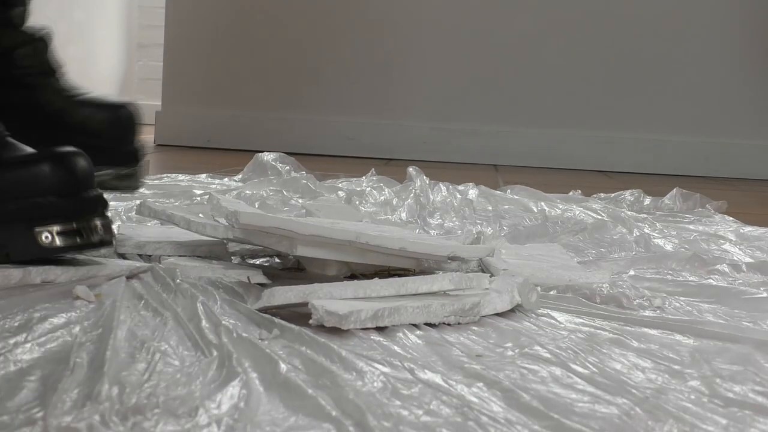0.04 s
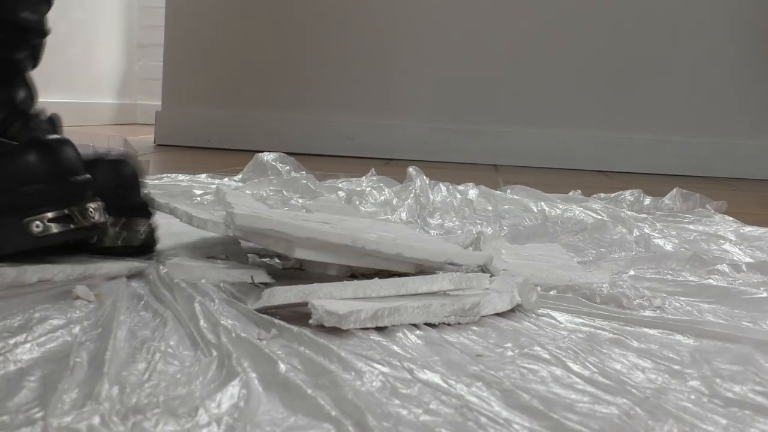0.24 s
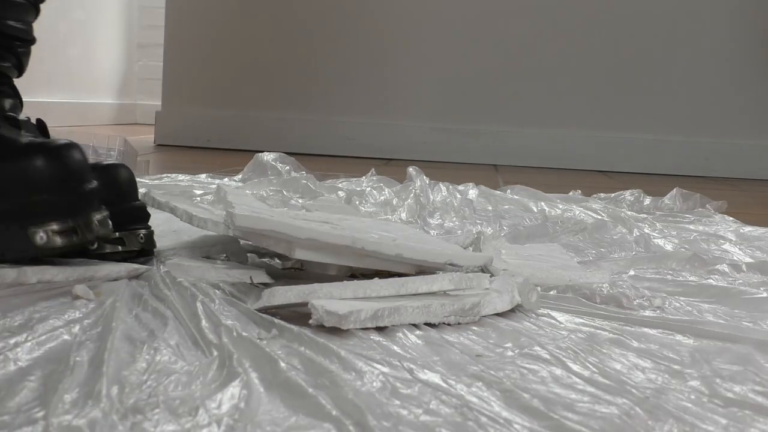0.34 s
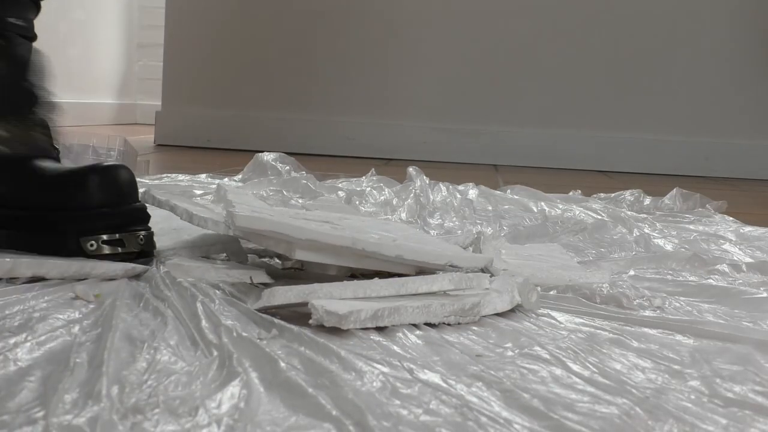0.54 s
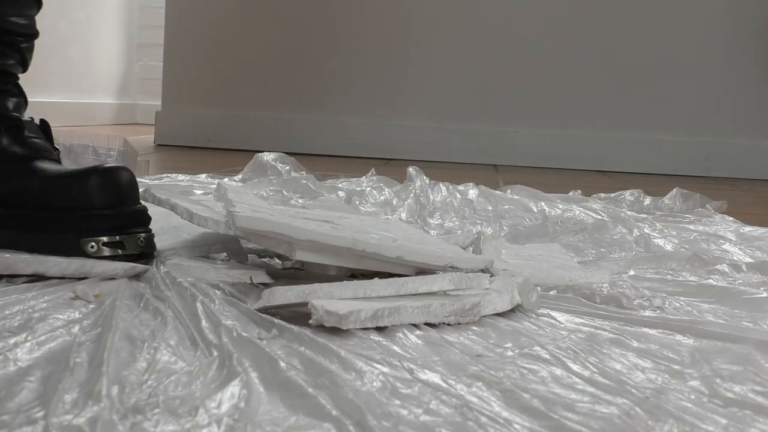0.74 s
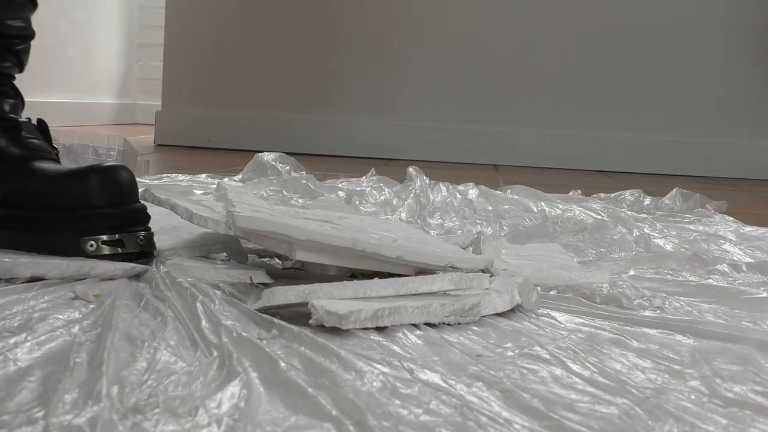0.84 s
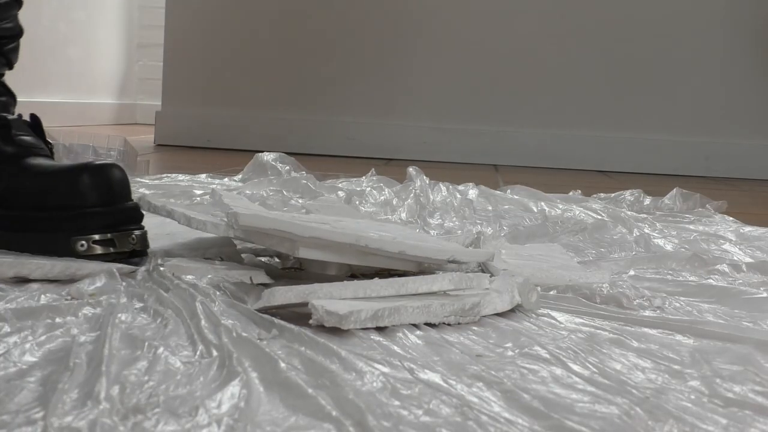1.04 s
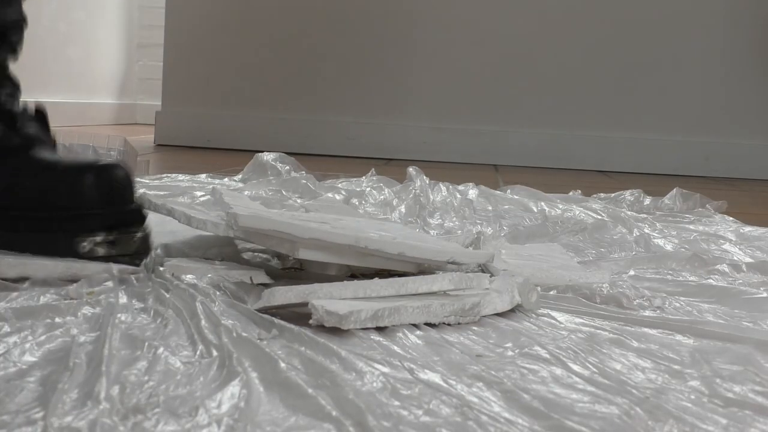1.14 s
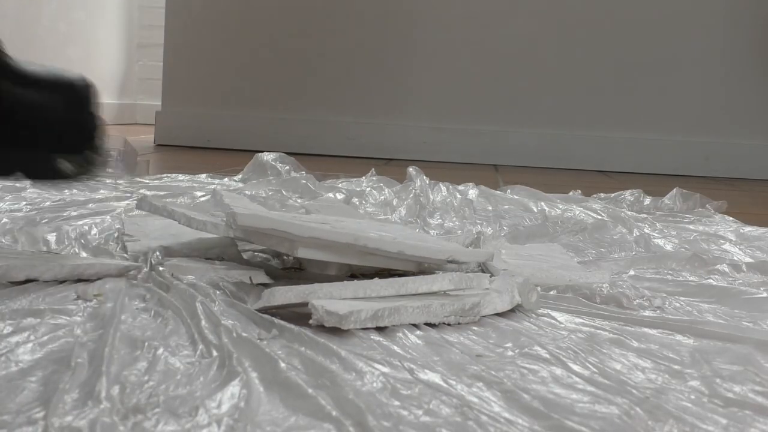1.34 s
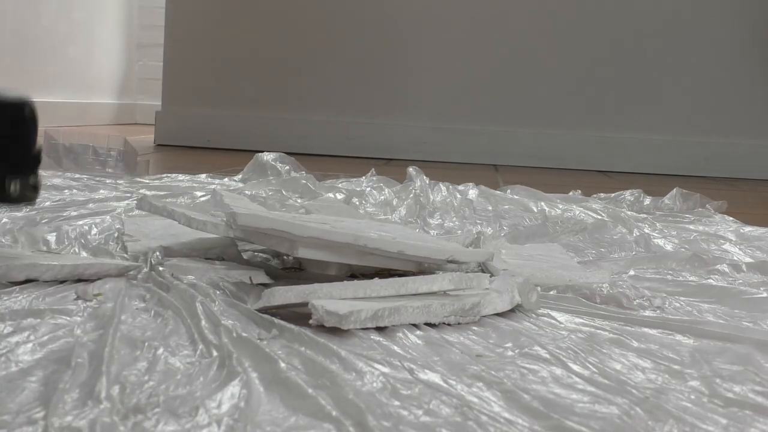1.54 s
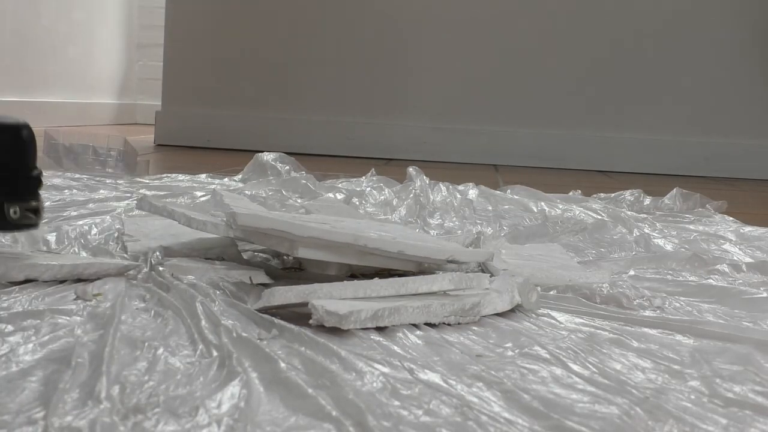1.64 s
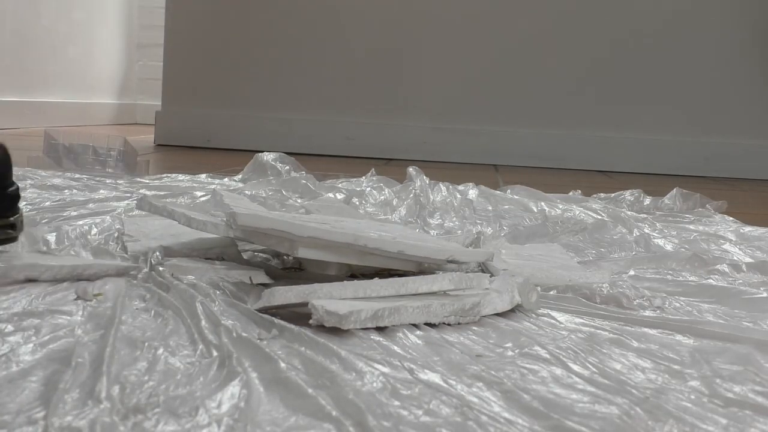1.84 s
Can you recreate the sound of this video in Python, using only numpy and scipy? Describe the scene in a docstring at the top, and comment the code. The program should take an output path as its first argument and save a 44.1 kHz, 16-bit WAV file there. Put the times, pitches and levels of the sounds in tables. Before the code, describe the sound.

Foam slabs crunching and snapping as a boot stomps twice, then drags away indoors.

```python
"""Two boot steps on styrofoam

Slabs lie on plastic sheeting in a small room, close to the microphones and a little to the left.
A heavy stomp crushes one, which rings out over a boom of the floor; the sheet ticks and rustles.
The second step knocks and squeezes the foam until it snaps, and the boot drags away."""
import sys
import numpy as np
from scipy import signal
from scipy.fft import rfft, irfft, next_fast_len
from scipy.io import wavfile
from scipy.ndimage import uniform_filter1d

SR = 44100
rng = np.random.default_rng(int(sys.argv[2]) if len(sys.argv) > 2 else 0)


def master(y):
    """Save y as 16-bit WAV."""
    cut = np.clip(np.atleast_2d(y).T, -1, 1)
    pcm = np.round(cut * 32767)  # scale
    wavfile.write(sys.argv[1], SR, pcm.astype(np.int16))


N = 83790
T = np.arange(N) / SR
STOMP_S = .2485
# the slab's modes: pitch_hz, level_db, t60_s
SLAB_MODES = [(355, -10, .6), (524, -1, .7), (1020, -4, 1), (1067, 1, 1.2), (1138, 0, 1), (1289, 1, 1.1),
              (1563, 1, 1.2), (1766, -2, 1.2), (1823, -3, 1.1), (2047, -3, 1.1), (2205, -4, .9),
              (2377, -3, 1), (2557, -1, 1), (3303, -8, .7)]


def amp(db):
    return 10 ** (np.asarray(db) / 20)


def unit_rms(x):
    return x / np.sqrt(np.mean(x ** 2) + 1e-20)


def curve_at(points, hz):
    """Join (freq_hz, value) points on a log frequency axis."""
    freqs, values = np.transpose(points)
    return np.interp(np.log(hz + 1), np.log(freqs + 1), values)


def colour(x, gain_db):
    """Minimum-phase filter; gain_db is a function of frequency."""
    size = 2 * next_fast_len(N // 2 + 8192, True)
    gain = amp(gain_db(np.fft.rfftfreq(size, 1 / SR)))
    cepstrum = irfft(np.log(np.maximum(gain, 1e-6)))
    cepstrum[1:size // 2] *= 2
    cepstrum[size // 2 + 1:] = 0
    return irfft(rfft(x, size) * np.exp(rfft(cepstrum)), size)[..., :N]


def hiss(tone):
    """Even coloured noise, rms 1."""
    return unit_rms(colour(rng.standard_normal(N), lambda hz: curve_at(tone, hz)))


def crackle(tone, per_s, spread_db, tilt_db=0):
    """Tiny random breaks of uneven size over an even rub, coloured and tilted per octave, rms 1."""
    chance, size, rub = rng.random(N), rng.standard_normal(N), rng.standard_normal(N)
    breaks = (chance < per_s / SR) * np.sign(rub) * amp(spread_db * np.clip(size, -2, 2))
    gain_db = lambda hz: curve_at(tone, hz) + tilt_db * np.log2(np.maximum(hz, 500) / 1000)
    return unit_rms(colour(unit_rms(breaks) + .5 * rub, gain_db))


def fader(points):
    """Gain through (time_s, level_db) points, fading out within 5 ms outside them."""
    times, db = np.transpose(points)
    gate = np.clip(np.minimum(T - times[0], times[-1] - T) / .005 + 1, 0, 1)
    return amp(np.interp(T, times, db)) * gate


def swell(peak_s, level_db, rise_db_per_s, fall_db_per_s, end_s):
    """Gain that climbs to a peak, falls away and stops."""
    below_db = np.maximum((peak_s - T) * rise_db_per_s, (T - peak_s) * fall_db_per_s)
    return amp(level_db - below_db) * np.clip((end_s - T) / .013, 0, 1)


def hump(start_s, rise_s):
    """Quick rise to 1 and a quick fall."""
    age = np.maximum(T - start_s, 0) / rise_s
    return (age * np.exp(1 - age)) ** 2


def ping(start_s, level_db, pitch_hz, rise_s):
    """A few heavily damped cycles."""
    return amp(level_db) * hump(start_s, rise_s) * np.sin(2 * np.pi * pitch_hz * (T - start_s))


def through_slab(x, lift_db=3.5, half_width_hz=26):
    """What passes through the slab is lifted at its modes and dips between them."""
    peaks = lambda hz: sum(1 / (1 + ((hz - mode) / half_width_hz) ** 2) for mode, _, _ in SLAB_MODES)
    return colour(x, lambda hz: lift_db * (np.minimum(peaks(hz), 1) - .5))


def hollow(x, centre_hz=789, octaves=.15, dip_db=-15.5):
    """The slab hardly radiates in the gap between its deep flex and its higher modes."""
    return colour(x, lambda hz: dip_db * np.exp(-(np.log2((hz + 1) / centre_hz) / octaves) ** 2))


def faint_hiss():
    """A thin treble hiss lies under both steps and slowly sinks."""
    # its course: time_s, level_db
    levels = [(0, -43.5), (.24, -41.5), (.7, -46.5), (.86, -52.5), (1.9, -54.5)]
    # its spectrum: freq_hz, gain_db
    tone = [(1000, -2.5), (3500, -0.5), (10000, -3), (15500, -5)]
    return fader(levels) * hiss(tone)


def floor_under_boot():
    """The boot's weight shuffles about and sets the floor booming."""
    # shifts of weight: peak_s, level_db, rise_db_per_s, fall_db_per_s, end_s
    shifts = [(0.059, -36.5, 300, 39, 0.42), (0.308, -30.5, 400, 57.5, 1.2), (0.689, -47.5, 148, 100, 0.77),
              (0.898, -40, 903, 81, .99), (1.79, -56, 400, 93, 1.94)]
    # their spectrum: freq_hz, gain_db
    shift_tone = [(30, -9), (90, -14.5), (180, -2.5), (310, 1.5), (470, 0), (700, -12), (1200, -43.5),
                  (4000, -79)]
    # the floor's boom: time_s, level_db
    boom_levels = [(0.0, -52), (0.12, -61), (0.226, -45), (0.248, -52), (0.316, -35.5), (0.586, -46.5),
                   (0.628, -59), (0.756, -53), (0.776, -60), (0.878, -59), (0.894, -66), (1.046, -68),
                   (1.078, -49), (1.27, -46), (1.422, -59.5), (1.9, -67)]
    # its spectrum: freq_hz, gain_db
    boom_tone = [(20, -30), (40, -26), (56, 0.5), (72, -23), (98, -9), (140, -36), (500, -78)]
    shuffle = sum(swell(*row) for row in shifts) * crackle(shift_tone, per_s=1500, spread_db=4)
    return shuffle + fader(boom_levels) * crackle(boom_tone, per_s=2300, spread_db=.5)


def slab_groans():
    """Breaking cells merge into a groan as the slab takes the load."""
    # groans: peak_s, level_db, rise_db_per_s, fall_db_per_s, end_s
    groans = [(.1, -36, 32, 8, .25), (0.264, -21, 1498, 42, .85), (.885, -30, 1500, 15, 1)]
    # their spectrum: freq_hz, gain_db
    tone = [(100, -39), (300, -16.5), (520, -11.5), (650, -14.5), (790, -16.5), (1050, -5), (1500, 0),
            (2000, -6.5), (2600, -6), (3500, -14), (5000, -27.5), (15000, -33)]
    cells = unit_rms(through_slab(crackle(tone, per_s=2300, spread_db=1)))
    return sum(swell(*row) for row in groans) * cells


def sole_thuds():
    """The sole knocks dully on the floor."""
    # knocks: start_s, level_db, pitch_hz, rise_s
    thuds = [(0.050, -29.5, 441, 0.0045), (.062, -32, 450, .008), (0.194, -37, 189, 0.015),
             (.262, -25.5, 351, .007), (.288, -23, 289, 0.0057), (.296, -28.5, 137, 0.013),
             (.363, -27.5, 188.6, 0.008), (.475, -35, 159, 0.013), (0.8635, -17.5, 228, 0.0032),
             (0.8663, -23, 335, 0.0058), (0.885, -36.5, 205.4, 0.019), (.915, -34.5, 294, .016),
             (1.05, -31, 280, 0.0027)]
    return sum(ping(*row) for row in thuds)


def foam_snaps():
    """Each snap rings the foam for a few cycles and throws a splinter of noise."""
    # snaps: start_s, level_db, pitch_hz, rise_s, splinter_db
    snaps = [(0.0915, -22.5, 1430, 0.001, -34), (0.114, -27, 1460, 0.00089, -30),
             (0.1413, -17.5, 1480, 0.00093, -36), (.167, -26, 1500, .0008, -32),
             (0.156, -19.5, 1620, 0.00088, -35), (.2480, -3, 2380, 0.00018, -14),
             (0.2513, -2, 2200, 0.00033, -14), (0.2535, -6, 2690, 0.00017, -13),
             (0.2574, -12, 3000, 0.00026, -20), (0.2613, -10, 1700, 0.0014, -25),
             (0.266, -10, 3300, 0.0005, -26), (0.2785, -11, 1450, 0.0007, -30),
             (0.300, -10, 1380, 0.0013, -26), (.3660, -12.5, 5600, .0012, -25),
             (.3675, -11.5, 2880, .0005, -24), (0.8397, -27, 890, 0.00074, -20),
             (0.8626, -13, 1610, 0.00045, -26), (.8684, -5.5, 2440, 0.0003, -17),
             (0.8685, 2.5, 1487, 0.0012, -25), (.8690, -13.5, 955, .0011, -34),
             (.8632, -18, 596, 0.00079, -28), (0.9825, -0.5, 2510, 0.00036, -19.5),
             (0.9821, -9.5, 1400, 0.0008, -21), (1.0404, -11.5, 1880, 0.00034, -16)]
    # a splinter's spectrum: freq_hz, gain_db
    splinter_tone = [(500, 5), (3000, 6), (6000, -8.5), (11000, -1), (15500, -1), (18000, -27)]
    splinter = hiss(splinter_tone)
    cracks = sum(ping(start, db, hz, rise) + amp(splinter_db) * hump(start, rise) * splinter
                 for start, db, hz, rise, splinter_db in snaps)
    low_cut = signal.butter(2, 430, "high", fs=SR, output="sos")  # the snaps carry no bass
    return signal.sosfilt(low_cut, cracks)


def foam_settling():
    """The crushed foam crackles brightly as it settles."""
    # the crackle's course: time_s, level_db
    levels = [(.246, -32), (.252, -30), (.275, -28), (.315, -30.5), (.36, -29.5), (.385, -26.5),
              (.43, -28.5), (.5, -34.5), (.6, -45.5), (.7, -50.5), (.74, -50)]
    # its spectrum: freq_hz, gain_db
    tone = [(1500, -32), (2700, 2), (4000, -0.5), (6000, 0), (8500, -6), (11500, -6.5), (15800, -20)]
    return fader(levels) * crackle(tone, per_s=3700, spread_db=0)


def foam_crunches():
    """Cells break in clumps under both steps, and in a long squeeze under the second."""
    # clumps: start_s, level_db, length_s, tilt_db_per_octave
    clumps = [(0.248, -21.5, .016, -1), (0.283, -20, 0.0033, -3), (0.3661, -14, 0.0049, 1),
              (0.3813, -18, .0006, 7), (0.943, -24.5, 0.006, -8.5), (0.974, -20, 0.0022, 10),
              (0.9814, -17.5, 0.0019, 1), (0.9866, -17, 0.002, 0), (1.029, -22.5, 0.0037, -2),
              (1.0462, -23.5, 0.0056, -2)]
    # the squeeze: time_s, level_db
    squeeze = [(.855, -66), (.865, -28), (.90, -38.5), (.94, -25), (.975, -23), (.99, -33), (.999, -37),
               (1.025, -33), (1.06, -36.5), (1.1, -63)]
    # spectrum of breaking cells: freq_hz, gain_db
    tone = [(150, -29), (480, -21), (680, -31), (850, -23.5), (1100, 0.5), (1600, 1), (2900, -2.5),
            (3600, -4), (4400, -9.5), (7000, -11), (10000, -9.5), (15500, -21)]
    out = fader(squeeze) * crackle(tone, per_s=3600, spread_db=4)
    for start, db, length, tilt in clumps:
        attack = np.clip((T - start) / .0003, 0, 1)
        release = np.exp(-np.maximum(T - start - length, 0) / .001)
        out += amp(db) * attack * release * crackle(tone, per_s=5700, spread_db=4.5, tilt_db=tilt)
    return out


def slab_crush(start_hz=2610, end_hz=1180, sag_s=.019, hold_s=.025, fall_db_per_s=274):
    """A run of cracks under the stomp, ever lower and weaker as the slab gives way."""
    out = np.zeros(N)
    for k, (jitter, detune, size) in enumerate(rng.standard_normal((52, 3))):
        age = abs(k + .396 * jitter) * .0011
        hz = (end_hz + (start_hz - end_hz) * np.exp(-age / sag_s)) * np.exp(.27 * detune)
        db = -9.5 + 2 * size - fall_db_per_s * max(age - hold_s, 0)
        out += ping(STOMP_S + age, db, hz, rise_s=.00038)
    return out


def slab_ring(level_db=-29, rise_s=.0023):
    """After the stomp the slab's modes die away slowly, each slightly unsteady."""
    age = np.maximum(T - STOMP_S, 0)
    drifts = 4 * np.cumsum(rng.standard_normal((len(SLAB_MODES), N)), axis=1) / np.sqrt(SR)
    modes = sum(amp(db - 60 * age / t60) * np.sin(2 * np.pi * hz * age + drift)
                for (hz, db, t60), drift in zip(SLAB_MODES, drifts))
    return amp(level_db) * modes * (1 - np.exp(-age / rise_s))


def slab_flex(start_s=.256, start_hz=544.4, sag_hz_per_s=750):
    """The slab bends unevenly with a deep, falling note."""
    judder = 1 + .8 * unit_rms(uniform_filter1d(rng.standard_normal(N), size=180))
    mean_hz = start_hz - sag_hz_per_s * (T - start_s) / 2
    return judder * ping(start_s, -23.5, mean_hz, rise_s=.023)


def plastic_sheet(tick_rise_s=.00016, tick_noise_db=-11):
    """The film rustles, swishes as it is pulled taut, and ticks as its creases flip."""
    # rustles: peak_s, level_db, rise_db_per_s, fall_db_per_s, end_s
    rustles = [(.437, -30, 700, 500, .6), (.545, -41, 300, 200, .7), (.759, -27.5, 850, 400, .83),
               (.81, -38, 260, 90, .86), (1.568, -49, 600, 260, 1.7), (1.648, -44, 330, 110, 1.95)]
    # flipping creases: start_s, level_db, pitch_hz
    creases = [(.5496, -10, 9000), (.5546, -23, 9800), (.5885, -11, 10200), (.5982, -26, 10500),
               (.7069, -15.5, 9300), (.7303, -16, 9500), (.7328, -20, 9300), (.7386, -17, 9400),
               (.7448, -16, 9000), (.7503, -15, 9700), (.7559, -13, 9900)]
    # the film's spectrum: freq_hz, gain_db
    film_tone = [(800, -74), (2300, -10.5), (4500, -8), (7000, -4.5), (8600, -6.5), (9900, -4),
                 (11500, -7.5), (13000, -9), (15800, -17)]
    # the swish's spectrum: freq_hz, gain_db
    swish_tone = [(4000, -40), (7500, -9), (9000, -3), (9900, 1), (11000, -5), (12500, -13), (15800, -18)]
    rustle = sum(swell(*row) for row in rustles) * crackle(film_tone, per_s=6000, spread_db=1)
    swish = swell(.758, -23.5, 750, 330, end_s=.787) * crackle(swish_tone, per_s=2000, spread_db=3)
    tick_noise = amp(tick_noise_db) * hiss(film_tone)
    ticks = sum(ping(start, db, hz, tick_rise_s) + amp(db) * hump(start, tick_rise_s) * tick_noise
                for start, db, hz in creases)
    return rustle + swish + ticks


def floor_scuff():
    """The sole rubs low on the floor as it leaves."""
    # the rub's spectrum: freq_hz, gain_db
    tone = [(120, -22), (200, -6), (275, 0), (360, -8), (460, -4), (650, -19), (1500, -55)]
    return swell(1.09, -41.5, 90, 38, end_s=1.8) * crackle(tone, per_s=1500, spread_db=3)


def boot_drag(sing_hz=1593, half_width_hz=35, sing_db=6.5, dull_db_per_s=23):
    """The sole drags over the foam, duller as it slows; the rubbed slab sings faintly."""
    # the drag's course: time_s, level_db
    levels = [(1.06, -46), (1.064, -40), (1.176, -30.5), (1.538, -47), (1.67, -49), (1.774, -53),
              (1.9, -58)]
    # its spectrum: freq_hz, gain_db
    tone = [(290, -23), (500, -21), (603, -23.5), (829, -18), (958, -6.5), (1500, -3.5), (2150, -6),
            (2350, -5), (2710, -8), (4500, -9.5), (7560, -16), (10400, -21.5), (15800, -39)]
    rub = crackle(tone, per_s=5000, spread_db=2)
    rub = unit_rms(colour(rub, lambda hz: sing_db / (1 + ((hz - sing_hz) / half_width_hz) ** 2)))
    body = signal.sosfiltfilt(signal.butter(2, 4500, fs=SR, output="sos"), rub)
    treble = (rub - body) * amp(-dull_db_per_s * np.maximum(T - 1.2, -.1))
    return amp(1.5) * fader(levels) * (body + treble)


def scene(room_db=-13, room_t60_s=.065, room_tone_db=-64):
    """Everything happens left of the microphones; near walls answer briefly over quiet room tone."""
    # the left microphone's lead over the right: freq_hz, lead_db
    left_lead = [(60, .7), (160, 8), (350, 5.6), (700, 4.6), (1400, 3.6), (5000, 3), (11000, 4)]
    # spectrum of the room tone: freq_hz, gain_db
    room_tone = [(25, -8), (57, 9), (110, -8), (400, -3), (700, -17), (1400, -7), (5000, -25), (15800, -29)]
    direct = hollow(sole_thuds() + foam_snaps() + through_slab(slab_crush() + slab_flex()))
    direct += slab_ring() + slab_groans() + foam_settling() + foam_crunches()
    direct += plastic_sheet() + faint_hiss() + floor_under_boot() + floor_scuff() + boot_drag()
    delay = T[:SR // 4]
    walls = rng.standard_normal((2, len(delay))) * amp(-60 * delay / room_t60_s)
    echoes = signal.fftconvolve(direct[None], walls / np.linalg.norm(walls[0]), axes=1)[:, :N]
    channels = []
    for echo, side in zip(echoes, (-1, 1)):
        pan_db = lambda hz: 20 * np.log10(2 / (1 + amp(side * curve_at(left_lead, hz))))
        at_microphone = colour(direct + amp(room_db) * echo, pan_db)
        channels.append(at_microphone + amp(room_tone_db) * hiss(room_tone))
    return np.array(channels)


def record(dry, top_hz=15850):
    """The loudest snaps round off at full scale; nothing is kept above the band limit."""
    rounded = dry / (1 + np.abs(dry) ** 6) ** (1 / 6)
    size = next_fast_len(N + SR // 4)
    in_band = np.fft.rfftfreq(size, 1 / SR) < top_hz
    return irfft(rfft(rounded, size) * in_band, size)[:, :N]


dry = scene()
out = record(dry)
master(out)
```